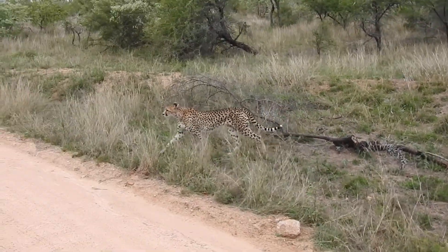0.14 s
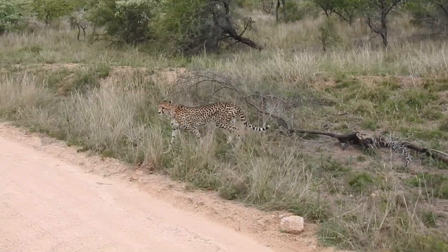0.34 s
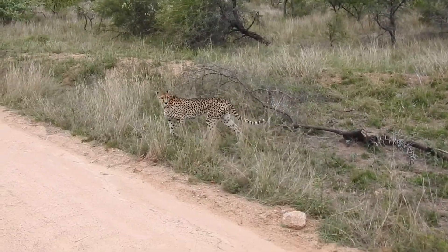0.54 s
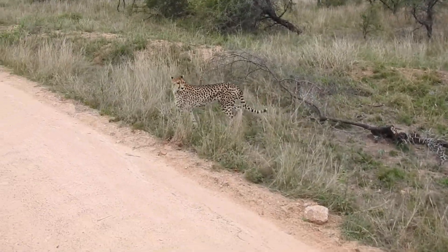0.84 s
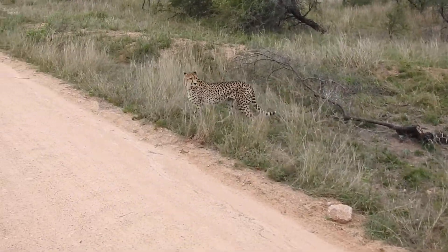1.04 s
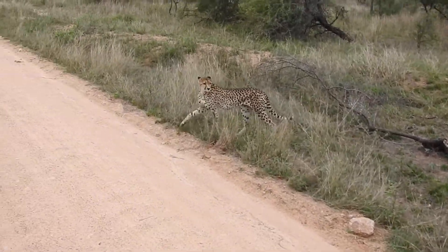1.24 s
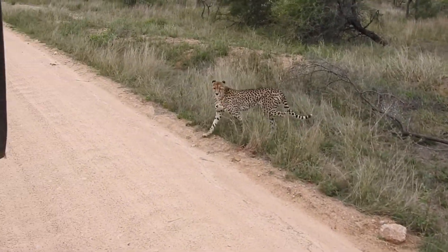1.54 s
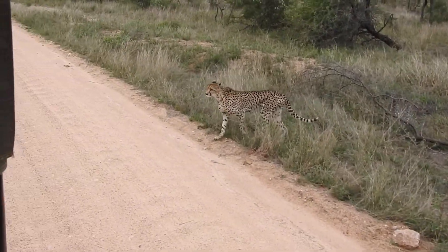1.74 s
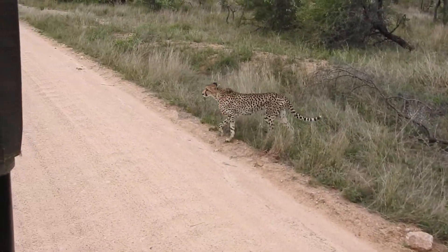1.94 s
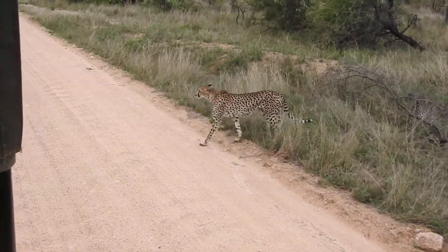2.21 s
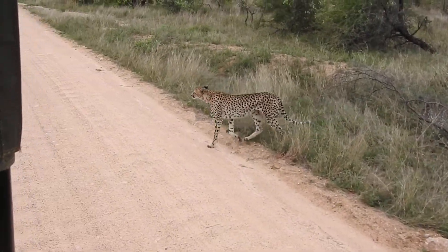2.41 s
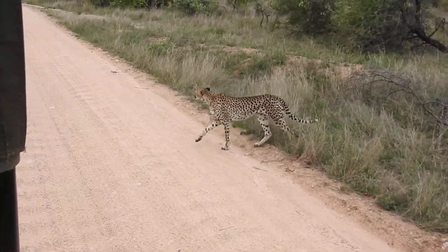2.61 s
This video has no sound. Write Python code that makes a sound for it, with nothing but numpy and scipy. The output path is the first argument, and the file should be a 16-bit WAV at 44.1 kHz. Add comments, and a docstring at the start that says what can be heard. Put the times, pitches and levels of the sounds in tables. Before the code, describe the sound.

Wavering, chirp-like squeaks, probably rubbing parts though resembling a cheetah's chirps, sound mainly on the right at 0.3-1.1 and 1.6-2.8 seconds, gliding between whistle and rasp. Before them, bumps, ticks, dry rubbing and a sharp plastic knock at 0.2 fall close to the microphone. Small bumps near 1.0-1.2, rustles and a wind puff near 2.7. A throbbing idle engine and air hiss run throughout.

```python
"""An open vehicle idles beside a dirt road: a throbbing engine under rumble and open-air hiss.
First come bumps, knocks, ticks and dry rubbing close to the microphone, as damped modes and noise bursts.
Two runs of thin, wavering, chirp-like squeaks follow on the right, most likely something rubbing as it
sticks and slips: gliding harmonics pass through a resonance, between clean whistle and rasp, and flutter
in cabin reflections. Small rubs, bumps, ticks, rustles and a last puff of wind fall among them."""
import sys
import numpy as np
from scipy import signal
from scipy.fft import rfft, irfft
from scipy.io import wavfile
from scipy.ndimage import uniform_filter1d

SR = 44100
rng = np.random.default_rng(int(sys.argv[2]) if len(sys.argv) > 2 else 0)


def to_wav(s):
    """Save 16-bit WAV."""
    ch = np.atleast_2d(s).T  # columns
    pcm = np.round(np.clip(ch, -1, 1) * 32767)  # PCM
    wavfile.write(sys.argv[1], SR, pcm.astype(np.int16))


N = 122157
T = np.arange(N) / SR                              # time in s
BINS = np.maximum(np.fft.rfftfreq(N, 1 / SR), 1)   # spectrum frequencies in Hz
CUTOFF_HZ = 15800                                  # top of the recorded band


def from_db(db):
    """Logarithmic level: decibels to amplitude gain."""
    return 10 ** (np.asarray(db) / 20)


def rms_one(x):
    """Power normalisation: scale to unit mean square."""
    return x / np.sqrt(np.mean(x ** 2) + 1e-20)


def in_time(rows):
    """Linear interpolation: each column of a curve at every sample."""
    s, *columns = np.transpose(rows)
    return [np.interp(T, s, c) for c in columns]


def at_hz(points, hz):
    """Logarithmic pitch: read a curve over frequency on a log-frequency axis."""
    points_hz, values = np.array(points).T
    return np.interp(np.log(hz), np.log(points_hz), values)


def gate(start, end, fade):
    """Amplitude envelope: one between two times, with sloping edges."""
    return np.clip(np.minimum(T - start, end - T) / fade + .5, 0, 1)


def swell(centre, length):
    """Gaussian envelope: a smooth rise and fall about one time."""
    return np.exp(-2 * ((T - centre) / length) ** 2)


def panned(pan_db):
    """Interaural level difference: left and right gains, positive to the left."""
    return from_db(np.array([[.5], [-.5]]) * pan_db)


def shaped(gain):
    """Spectral shaping: unit-power noise with the given gain at each frequency."""
    return rms_one(irfft(rfft(rng.standard_normal(N)) * gain, N))


def drift(hz):
    """Low-pass random process: unit-power wander up to about the given rate."""
    return shaped(1 / (1 + (BINS / hz) ** 2))


def noise(spectrum):
    """Coloured noise: unit power, falling away below the first point of the spectrum."""
    low_fall = np.minimum(BINS / spectrum[0][0], 1) ** 4
    return shaped(from_db(at_hz(spectrum, BINS)) * low_fall)


def band(x, low_hz, high_hz):
    """Band-pass filtering, with gain that keeps the power of white noise."""
    sos = signal.butter(3, [low_hz, high_hz], "band", fs=SR, output="sos")
    return signal.sosfilt(sos, x + 1e-18) * np.sqrt(SR / 2 / (high_hz - low_hz))


CONTACT_S = .00004   # softness of a bump or knock


def click(s, db):
    """Impulsive contact: a slightly rounded impulse."""
    pulse = np.exp(-.5 * ((T - s) / CONTACT_S) ** 2)
    return from_db(db) * pulse / (pulse.sum() + 1e-12)


def strike(clicks, modes):
    """Modal synthesis: clicks set damped resonators ringing."""
    out = 0
    for hz, db, t60 in modes:
        radius = from_db(-60 / (t60 * SR))
        angle = 2 * np.pi * hz / SR
        poles = [1, -2 * radius * np.cos(angle), radius * radius]
        out = out + from_db(db) * signal.lfilter([0, np.sin(angle)], poles, clicks + 1e-18)
    return out


# spectrum of engine rumble and open-air hiss: frequency_hz [Hz], relative_level_db [dB per Hz]
AIR_SPECTRUM = [(38, -34), (47, -15.5), (62, -7), (125, -9.5), (180, -7.5), (240, -13.5), (480, -20.5),
                (1000, -21), (1800, -28), (3700, -30.5), (6300, -28), (7500, -28.5), (9200, -41.5),
                (12000, -54), (15500, -60)]
# likeness of the two sides: frequency_hz [Hz], left_right_correlation [-1 to 1]
AIR_CORRELATION = [(60, 1), (150, 0.98), (300, 0.97), (1000, 0.72), (2500, 0.95), (6000, 0.06),
                   (12000, 0.04)]
AIR_DB, AIR_SWELL_DB = -34, 1.5   # level, and rms size of its slow wander, in dB


def air():
    """Partial coherence: low rumble is nearly alike on both sides, the highest hiss nearly independent."""
    alike = np.clip(at_hz(AIR_CORRELATION, BINS), -1, 1)
    mid = irfft(rfft(noise(AIR_SPECTRUM)) * np.sqrt((1 + alike) / 2), N)
    side = irfft(rfft(noise(AIR_SPECTRUM)) * np.sqrt((1 - alike) / 2), N)
    return from_db(AIR_DB + AIR_SWELL_DB * drift(3.1)) * np.array([mid + side, mid - side])


# engine orders: crank_rate_multiple [ratio], level_db [dB rms]
ENGINE_ORDERS = [(1, -48.5), (2, -34.5), (3, -42), (4, -40), (5, -49), (13, -53.5)]
CRANK_HZ, CRANK_WANDER = 24.85, 0.0057            # mean rate, and rms wander as a fraction of it
THROB_HZ, THROB_DB, THROB_S = 178.4, -32.5, .032  # mean pitch, peak level and width of each hum
THROB_AT_S, THROB_PERIOD_S = .522, .1607          # the hum swells about six times a second


def engine():
    """Periodic excitation: multiples of a wandering crank rate, and a swelling hum that makes it throb."""
    turns = np.cumsum(CRANK_HZ * (1 + CRANK_WANDER * drift(2.95))) / SR
    orders = 0
    for multiple, db in ENGINE_ORDERS:
        orders = orders + from_db(db) * np.sin(2 * np.pi * (round(multiple) * turns + rng.random()))
    from_throb = (T - THROB_AT_S + THROB_PERIOD_S / 2) % THROB_PERIOD_S - THROB_PERIOD_S / 2
    throb = from_db(THROB_DB) * np.exp(-2 * (from_throb / THROB_S) ** 2)
    hum = throb * np.sin(2 * np.pi * THROB_HZ * turns / CRANK_HZ)
    return np.sqrt(2) * (orders + hum)   # rms levels to peak amplitudes


# puffs of wind on the microphone: centre_s [s], length_s [s], level_db [dB]
WIND_PUFFS = [(0.052, 0.042, -27), (.225, 0.049, -22), (2.678, 0.13, -27)]
# spectrum of the puffs: frequency_hz [Hz], relative_level_db [dB]
WIND_SPECTRUM = [(60, 0), (100, 2), (170, -4), (300, -19.5), (700, -22), (1400, -30), (4000, -73),
                 (12000, -88)]


def wind():
    """Turbulent pressure: puffs buffet each side of the microphone with independent noise."""
    force = sum(from_db(db) * swell(s, length) for s, length, db in WIND_PUFFS)
    return force * np.array([noise(WIND_SPECTRUM), noise(WIND_SPECTRUM)])


# soft rustles: centre_s [s], level_db [dB], low_hz [Hz], high_hz [Hz]
RUSTLE_EVENTS = [(1.022, -35, 300, 1050), (2.571, -35, 328.5, 650), (2.575, -37, 1500, 4800),
                 (2.735, -34.5, 625, 1520)]
RUSTLE_S = 0.018


def rustles():
    """Band-limited noise: soft scuffs that swell and fade."""
    out = 0
    for s, db, low, high in RUSTLE_EVENTS:
        scuff = band(rng.standard_normal(N), low, high)
        out = out + from_db(db) * swell(s, RUSTLE_S) * scuff
    return out


# small creaking ticks: start_s [s], level_db [dB], low_hz [Hz], high_hz [Hz], pan_db [dB, left minus right]
TICK_EVENTS = [(.08, -21, 1400, 3300, 3), (.0905, -13, 4500, 8000, 2), (.2125, -13, 4500, 8500, 7),
               (.2695, -13, 900, 4100, 5), (.28, -12, 3600, 7500, -4), (.478, -13, 450, 2600, -2),
               (1.425, -17.5, 900, 4000, 2)]
TICK_T60_S, TICK_TAIL_DB, TICK_TAIL_T60_S = .006, -20, .05   # 60 dB decay times; tail relative to crack


def ticks():
    """Exponential decay: each tick is a brief noise crack with a faint diffuse tail."""
    out, crack, tail = 0, rng.standard_normal(N), rng.standard_normal((2, N))
    for s, db, low, high, pan in TICK_EVENTS:
        fall_db = -60 * np.maximum(T - s, 0)   # for a decay time of one second
        direct = crack * from_db(fall_db / TICK_T60_S)
        diffuse = tail * from_db(TICK_TAIL_DB + fall_db / TICK_TAIL_T60_S)
        burst = (T >= s) * (direct + diffuse)
        out = out + from_db(db) * panned(pan) * band(burst, low, high)
    return out


# dull bumps on the bodywork: start_s [s], level_db [dB]
BUMP_EVENTS = [(.062, -22.5), (.077, -17), (0.1951, -12.5), (1.02, -21), (1.157, -25.5), (1.172, -19),
               (2.66, -30)]
# modes of the bodywork: pitch_hz [Hz], level_db [dB], t60_s [s]
BODYWORK_MODES = [(97, -11.5, 0.16), (139, -3.5, 0.096), (216, 1.5, 0.037), (338, -13, 0.027),
                  (554, -4, .02), (880, -21, 0.0043)]


def bumps():
    """Modal response: bumps set low bodywork modes ringing, equal on both sides."""
    return strike(sum(click(s, db) for s, db in BUMP_EVENTS), BODYWORK_MODES)


# plastic knocks: start_s [s], level_db [dB], pan_db [dB, left minus right]
KNOCK_EVENTS = [(0.0783, -21.5, -1), (.1955, -26.5, -16), (0.2015, -7.5, 17.5), (1.021, -43, -12)]
# modes of the plastic: pitch_hz [Hz], level_db [dB], t60_s [s]
PLASTIC_MODES = [(530, -26, 0.16), (723, -3.5, 0.011), (1147, -0.5, 0.012), (1400, 5, 0.0032),
                 (2120, 5, 0.0028), (3150, -14.5, 0.021)]


def knocks():
    """Modal response: sharper plastic knocks near the microphone excite higher modes."""
    return strike(sum(click(s, db) * panned(pan) for s, db, pan in KNOCK_EVENTS), PLASTIC_MODES)


# dry rubbing without a squeak: start_s [s], length_s [s], level_db [dB], pan_db [dB, left minus right]
RUB_STROKES = [(-.01, 0.21, -29.5, 3), (0.207, 0.066, -29.5, 4.5), (0.954, 0.036, -39, -16),
               (1.158, 0.05, -37, -12), (1.981, 0.054, -36.5, -4)]
# spectrum of the rubbing: frequency_hz [Hz], relative_level_db [dB]
RUB_SPECTRUM = [(1500, -6.5), (3900, -6.5), (5500, -1.5), (7000, 2.5), (9200, -19), (12000, -31),
                (15500, -45)]
RUB_FADE_S = 0.0064


def rubs():
    """Sliding friction: short strokes of hiss where the surfaces slide freely."""
    level = 0
    for s, length, db, pan in RUB_STROKES:
        level = level + from_db(db) * panned(pan) * gate(s, s + length, RUB_FADE_S)
    return level * np.array([noise(RUB_SPECTRUM), noise(RUB_SPECTRUM)])


# one list per squeak: time_s [s], pitch_hz [Hz, slip rate], roughness [0 clean, about 1 rough]
SQUEAK_GLIDES = [
    [(.279, 3296, 0.96), (.312, 3256, 1.36), (.324, 3850, 0.58), (.35, 3680, 0.8), (.39, 3440, 0.6),
     (.42, 3750, 1.2)],
    [(.415, 2246, 0.3), (.45, 2213, 0.48), (.468, 2378, 0.3), (.50, 2230, 0.6), (.53, 2230, 0.35),
     (.555, 2240, .4), (.585, 2097, 0.4), (.618, 2035, 0.12)],
    [(.56, 4097, 0.75), (.605, 3830, 0.69), (.622, 3395, 0), (.655, 3165, 0.93), (.69, 3570, 0.4),
     (.715, 3477, 0.24), (.75, 3830, 0.33), (.78, 3860, 0.15), (.80, 3810, 0), (.822, 3800, 0.04)],
    [(.818, 3870, 0.16), (.842, 3400, 0.06), (.878, 3270, 0.12), (.892, 3260, 0.02), (.912, 3690, 0.69),
     (.926, 3980, 0), (.97, 4063, 0.24), (1.01, 3980, 0.24), (1.045, 3950, 0), (1.08, 3650, 0.35),
     (1.10, 3270, 0.65), (1.135, 3310, 1)],
    [(1.59, 12200, 0.12), (1.62, 10360, 0.42), (1.638, 8680, 0.37), (1.67, 8380, 0.32), (1.695, 7700, 0.36),
     (1.717, 6230, 0.3), (1.748, 5180, 0)],
    [(1.742, 4620, 0.54), (1.755, 3966, 0.52), (1.78, 4415, 0.44), (1.82, 3890, 1.36), (1.85, 4020, 1.07),
     (1.868, 3996, 0.08), (1.90, 3852, 0.08), (1.917, 3880, 0.23), (1.926, 3637, 0.17), (1.94, 3890, 0.31),
     (1.975, 3780, 0.19), (1.99, 3846, 1.23), (2.008, 3976, 0.14), (2.018, 3190, 0.6), (2.04, 2730, 0.15)],
    [(2.03, 2690, 0.02), (2.055, 2611, 0.26), (2.095, 2724, 0.33), (2.115, 2822, 0.01), (2.15, 2852, 0.06),
     (2.18, 2827, 0), (2.218, 2957, 0.1)],
    [(2.217, 2714, 0.2), (2.238, 2734, 0.02), (2.275, 2697, 0), (2.305, 2673, 0.02), (2.33, 3143, 0.08),
     (2.37, 2820, 0.3), (2.39, 2638, 0.18), (2.432, 2393, 0.18), (2.45, 2464, 0.97), (2.48, 2536, 0.37),
     (2.52, 2465, 0.15), (2.555, 2666, 0.2), (2.60, 2840, 0.22), (2.65, 2675, 0.1)],
    [(2.435, 2996, 0.5), (2.48, 2810, 0.4)],
    [(2.645, 2736, 0.79), (2.68, 3032, 0.33), (2.715, 3060, 0.65), (2.75, 2820, 0.36), (2.775, 2930, 0)],
]
# multiplier on the resonance in dB, one per squeak: purity [ratio; less = richer overtones]
SQUEAK_PURITY = [0.86, 0.76, 0.9, 1.69, 1.43, 0.93, 1.02, 0.82, 0.77, 0.91]
# lift of the second harmonic, one per squeak: lift_db [dB]
SECOND_HARMONIC_DB = [-0.5, 7.5, 6, 1.5, -8, 5, -0.5, 2.5, -3, -6.5]
# resonance of the squeaking part: frequency_hz [Hz], gain_db [dB, before purity and peaking]
PART_RESONANCE = [(2200, -17.5), (2800, -28.5), (3500, -13), (4000, -8.5), (4500, -10), (5600, -4.5),
                  (6900, 2.5), (8000, 0.5), (8900, -3.5), (10000, -11.5), (11300, -26), (13000, -37),
                  (15000, -83)]
# sound radiated besides the resonance: frequency_hz [Hz], gain_db [dB]
SIDE_RADIATION = [(2200, -33), (2700, -19.5), (3700, -33.5), (11800, -31.5), (15500, -57)]
# spectrum of the friction noise: frequency_hz [Hz], relative_level_db [dB]
RASP_SPECTRUM = [(2000, -40), (3500, -22), (5000, -18.5), (6200, 9), (7200, -3), (8500, -5), (9200, -14),
                 (10000, -36), (13000, -44), (15000, -61)]
# spells when every second slip is weaker: start_s [s], end_s [s], in_between_partials_db [dB]
PERIOD_DOUBLINGS = [(2.079, 2.228, -13), (2.65, 2.8, -3)]
DOUBLING_FADE_S = .03
PEAKING_PER_DB, USUAL_LEVEL_DB = .2, -28   # loud squeaks sit more purely on the resonance
JITTER, JITTER_HZ = .05, 450               # rms pitch fraction at roughness 1, and its rate
WAVER, WAVER_HZ = .007, 60                 # rms pitch fraction at any roughness, and its rate
SHIMMER_DB, RASP_DB = 4.5, -8              # rms level wander and friction noise at roughness 1


def stick_slip(level_db):
    """Stick-slip oscillation: harmonics glide through one resonance; rough slipping jitters and rasps."""
    peaking = np.maximum(2.0 + PEAKING_PER_DB * (level_db - USUAL_LEVEL_DB), .85)
    jitter, waver, shimmer = drift(JITTER_HZ), drift(WAVER_HZ), drift(JITTER_HZ)
    rasp = noise(RASP_SPECTRUM)
    doubling = sum(from_db(db) * gate(start, end, DOUBLING_FADE_S) for start, end, db in PERIOD_DOUBLINGS)
    source = np.zeros(N)
    for rows, purity, octave_db in zip(SQUEAK_GLIDES, SQUEAK_PURITY, SECOND_HARMONIC_DB):
        hz, rough = in_time(rows)
        contact = gate(rows[0][0], rows[-1][0], 0.0073)
        on = contact > 0
        slip_hz = hz * (1 + JITTER * rough * jitter + WAVER * waver)
        phase = 2 * np.pi * np.cumsum(slip_hz[on]) / SR
        tone = 0
        for k in np.arange(2, 13) / 2:   # harmonics 1 to 6 and the partials halfway between
            partial_hz = k * hz[on]
            resonance_db = at_hz(PART_RESONANCE, partial_hz) * purity * peaking[on]
            resonant = from_db(resonance_db + octave_db * (k == 2))
            gain = (resonant + from_db(at_hz(SIDE_RADIATION, partial_hz))) * (partial_hz < CUTOFF_HZ)
            tone = tone + gain * np.sin(k * phase) * (doubling[on] if k % 1 else 1)
        friction = from_db(RASP_DB) * (rough * rasp)[on]
        source[on] += contact[on] * from_db(SHIMMER_DB * rough * shimmer)[on] * (tone + friction)
    return source


CABIN_T60_S = 0.07


def cabin(x, wet_db):
    """Reverberation: direct sound plus a quickly dying cluster of reflections."""
    t = T[:SR // 8]
    echoes = rng.standard_normal(len(t)) * from_db(-60 * t / CABIN_T60_S)
    return x + from_db(wet_db) * signal.fftconvolve(x, echoes / np.linalg.norm(echoes))[:N]


# loudness of the first run of squeaks: time_s [s], level_db [dB, before the side levels]
FIRST_RUN_LEVEL = [(0.28, -24), (0.4, -18), (0.418, -30.5), (0.476, -16.5), (0.498, -30.5), (0.524, -20.5),
                   (0.556, -32.5), (0.578, -25), (.612, -22.5), (.617, -17), (0.654, -21), (0.684, -30.5),
                   (0.7, -22.5), (0.77, -39), (0.824, -41.5), (0.834, -26), (0.882, -16.5), (0.9, -19),
                   (0.95, -43), (0.964, -33), (0.982, -42.5), (1.048, -39.5), (1.096, -26.5), (1.15, -52)]
# loudness of the second run of squeaks: time_s [s], level_db [dB, before the side levels]
SECOND_RUN_LEVEL = [(1.59, -57), (1.648, -38.5), (1.728, -28), (1.736, -40), (1.75, -26.5), (1.848, -28.5),
                    (1.858, -38), (1.863, -27.5), (1.882, -26.5), (1.886, -19.5), (1.904, -16.5),
                    (1.914, -19.5), (1.966, -16.5), (2.0, -32.5), (2.006, -24), (2.178, -33.5),
                    (2.282, -25), (2.291, -41.5), (2.305, -24), (2.378, -34), (2.415, -26), (2.425, -34),
                    (2.486, -24.5), (2.492, -30), (2.648, -31), (2.658, -26), (2.77, -29.5)]
# squeak level on the far side: time_s [s], level_db [dB, added to the left level]
FAR_SIDE_LEVEL = [(.3, -0.5), (1.1, -9), (1.7, 0), (1.93, -5), (2.2, 0), (2.7, -4)]
SQUEAK_LEFT_DB, SQUEAK_RIGHT_DB = -2.5, 7.5
CABIN_LEFT_DB, CABIN_RIGHT_DB = 12, 9.5   # reflections relative to direct sound


def squeaks():
    """Source, reflections and level difference: squeaks flutter in the cabin, stronger on the right."""
    level_db, = in_time(list(FIRST_RUN_LEVEL) + list(SECOND_RUN_LEVEL))
    far_db, = in_time(FAR_SIDE_LEVEL)
    source = stick_slip(level_db)
    sounding = sum(gate(run[0][0], run[-1][0], 0.0033) for run in (FIRST_RUN_LEVEL, SECOND_RUN_LEVEL))
    sides = []
    for side_db, wet_db in (SQUEAK_LEFT_DB + far_db, CABIN_LEFT_DB), (SQUEAK_RIGHT_DB, CABIN_RIGHT_DB):
        heard = cabin(source, wet_db)
        power = np.abs(uniform_filter1d(heard ** 2, size=500))   # over about 11 ms
        even = heard / np.sqrt(power + 1e-6)   # level loudness, so that the run tables set it
        sides.append(even * sounding * from_db(level_db + side_db))
    return np.array(sides)


LEFT_LAG_S = .000068   # extra travel time to the left microphone


def scene():
    """Superposition and time difference: all sources add, and reach the left side slightly later."""
    friction = squeaks() + rubs() + rustles()
    impacts = bumps() + knocks() + ticks()
    background = engine() + air() + wind()
    left, right = friction + impacts + background
    lagged = irfft(rfft(left) * np.exp(-2j * np.pi * BINS * LEFT_LAG_S), N)
    return np.array([lagged, right])


LOW_CUT_HZ = 27.6


def record(dry):
    """Band limiting: a low cut, full-scale clipping and a steep top cut."""
    low_cut = signal.butter(3, LOW_CUT_HZ, "high", fs=SR, output="sos")
    top_cut = signal.ellip(10, .1, 80, CUTOFF_HZ, fs=SR, output="sos")
    lean = signal.sosfilt(low_cut, dry)
    return signal.sosfilt(top_cut, np.clip(lean, -1, 1))


dry = scene()
out = record(dry)
to_wav(out)
```